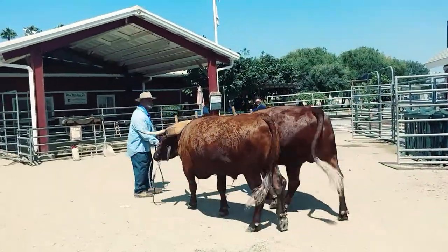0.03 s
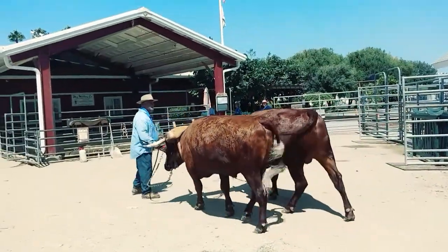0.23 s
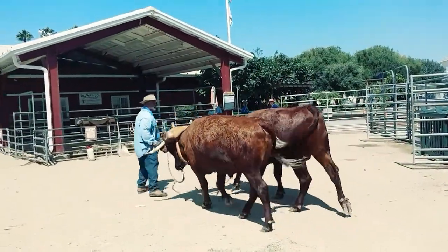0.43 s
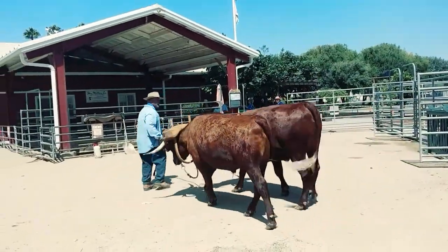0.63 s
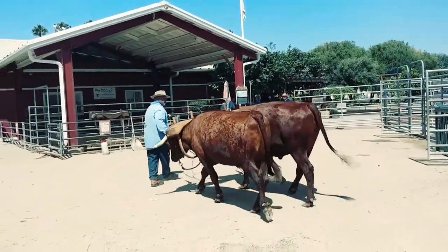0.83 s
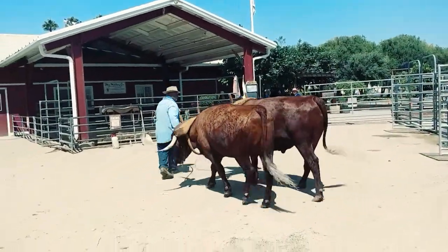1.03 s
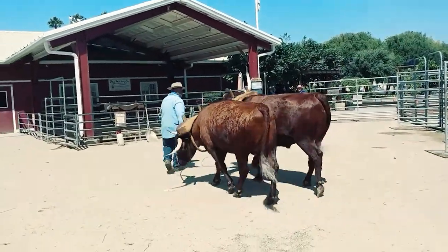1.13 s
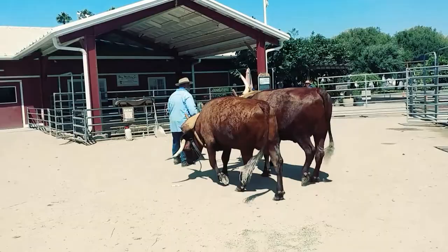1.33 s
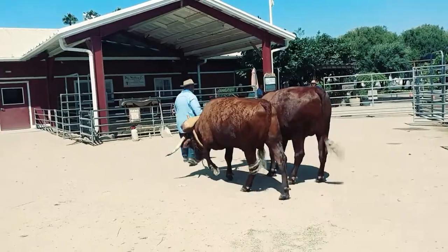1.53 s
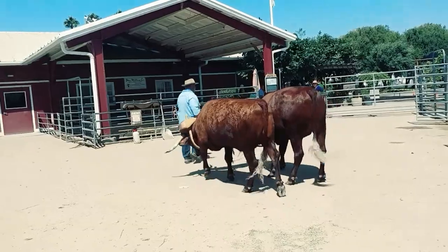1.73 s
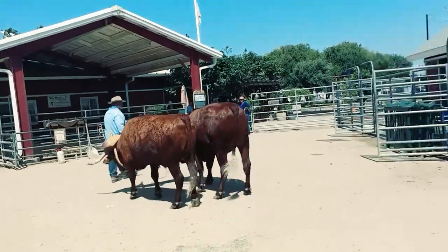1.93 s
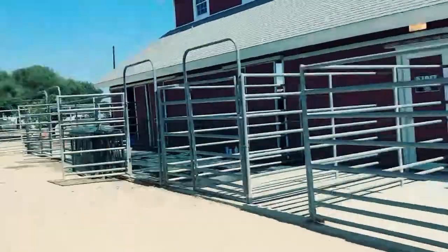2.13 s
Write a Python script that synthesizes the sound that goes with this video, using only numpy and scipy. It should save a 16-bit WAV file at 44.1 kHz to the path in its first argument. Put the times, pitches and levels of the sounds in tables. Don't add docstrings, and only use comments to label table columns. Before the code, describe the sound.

A cow gives a single deep moo that swells, rises and sags abruptly, over light metal chain clinks and a wooden hoof thud. Outdoor yard, dull short wall echo, distant traffic; phone stereo, right side duller.

```python
import sys
import numpy as np
from scipy import signal
from scipy.fft import rfft, irfft, next_fast_len
from scipy.io import wavfile
from scipy.ndimage import uniform_filter1d

SR = 44100
rng = np.random.default_rng(int(sys.argv[2]) if len(sys.argv) > 2 else 0)


def invert_db(x):
    u = np.asarray(x, float) / 20
    return 10 ** u


def materialize(psi):
    bounded = np.clip(np.atleast_2d(psi).T, -1, 1)
    quanta = np.round(bounded * 32767).astype(np.int16)
    wavfile.write(sys.argv[1], SR, quanta)


N = 97020


def at_hz(points, hz):
    table = np.array(points)
    return np.interp(np.log(hz + 1), np.log(table[:, 0]), table[:, 1])


def rms_one(x):
    return x / np.sqrt(np.mean(x ** 2) + 1e-20)


def drift(rate):
    r = np.exp(-80 * np.pi * rate / SR)
    noise = rng.standard_normal(N // 40 + 2002)
    slow = signal.lfilter([1], [1, -2 * r, r * r], noise)[2000:]
    return np.interp(np.arange(N) / 40, np.arange(len(slow)), rms_one(slow))


def ring(clicks, hz, t60):
    r, w = invert_db(-60 / (t60 * SR)), 2 * np.pi * hz / SR
    return signal.lfilter([0, np.sin(w)], [1, -2 * r * np.cos(w), r * r], clicks + 1e-18)


def colour(x, gain):
    size = next_fast_len(N + SR)
    hz = np.arange(size // 2 + 1) * SR / size
    return irfft(rfft(x, size) * gain(hz), size)[..., :N]


def resonance(hz, centre, width):
    return 1j * hz * width / (centre * centre - hz * hz + 1j * hz * width)


# (centre [Hz], width [Hz], level [dB], share of mouth opening [1],
# share of chest weight [1], share of rasp [1])
THROAT = [(252, 106, 7, 0, 1, 0.053), (359, 89, 3, -0.03, 0, -0.035), (523, 220, -6.5, 3.5, 0.059, -0.26),
          (696, 130, -3, 0.8, 0, -0.61), (944, 170, -0.5, 0.9, 0.26, -0.47),
          (1228, 169, -1.5, 0.66, 1, 0.12), (1572, 220, 1.5, 2, 0.95, 0.12),
          (2023, 210, -4.5, 0.75, 1, -0.42), (2523, 121, -5, 1.1, 0.074, 1), (2780, 330, -8, 2.2, 0, -0.98),
          (3175, 95, -4.5, 1.9, 0, 0.56), (3830, 180, -6, 4, 0, -0.91)]
NOSE_RESONANCES, NOSE_CUT_HZ = 4, 915
FOLD_CUT_HZ, CHEST_FROM_HZ = 3650, 248
NARROWING = 1
TUBE_ECHO_S, TUBE_ECHO_DB = 0.0015436, 3.5
TUBE_ECHO_FROM_HZ, TUBE_ECHO_TO_HZ = 550, 3000


def throat(hz, tuning, open_db, chest_db, rasp_db, wander_db):
    nose = 1 / (1 + (hz / NOSE_CUT_HZ) ** 4)
    out = 0
    for k, (centre, width, db, mouth, chest, rasp) in enumerate(THROAT):
        opening = open_db * mouth
        narrowed = width * invert_db(np.maximum(NARROWING * opening, -6))
        level = invert_db(db + opening + chest_db * chest + rasp_db * rasp + wander_db[k])
        exit_gain = nose if k < NOSE_RESONANCES else 1.3
        out = out + exit_gain * level * resonance(hz, centre * tuning, narrowed)
    fold = 1j * hz / FOLD_CUT_HZ
    fold_dulling = 1 / (1 + 1.083 * fold + fold * fold) ** 4
    low = 1j * hz / CHEST_FROM_HZ
    chest_cut = low * low / (1 + 1.34 * low + low * low)
    echo_band = hz ** 2 / (hz ** 2 + TUBE_ECHO_FROM_HZ ** 2) / (1 + (hz / TUBE_ECHO_TO_HZ) ** 4)
    echo = invert_db(TUBE_ECHO_DB) * echo_band * np.exp(-2j * np.pi * hz * TUBE_ECHO_S / tuning)
    return out * fold_dulling * chest_cut * (1 + echo) / 2


# (centre [Hz], width [Hz], gain at centre [dB])
WALL_COMB = [(239, 6.6, 5.5), (351.9, 4.9, -32), (395.4, 10, -29), (669.5, 15, 2.5)]


def wall_comb(hz):
    return np.prod([1 + (invert_db(db) - 1) * resonance(hz, c, w) for c, w, db in WALL_COMB], axis=0)


# (time [s], pitch [Hz], effort [dB], mouth opening [dB], chest weight [dB], rasp [dB])
MOO = [(0.042, 89.87, -45, -55, -2, 0), (0.138, 97.1, -38.5, -36.5, -0.5, -2),
       (.28, 103.1, -34.5, -34, 2.5, -8), (0.328, 105.5, -33.5, -6.5, 4, 1), (0.449, 109, -28, -4.5, 3, 4),
       (.6, 111, -26, -2.5, 1.5, 6.5), (.742, 114.8, -24, -2.5, 2.5, 6),
       (0.847, 118.9, -20.5, -2.5, 2, 3.5), (0.944, 125.6, -21, -0.77, 0.4, 0),
       (1.03, 129.3, -19.5, -0.1, -0.5, -1), (1.137, 133, -18, -0.8, -0.5, -5),
       (1.331, 129.7, -17.5, -0.48, -2.3, -3), (1.4, 123.7, -18, -1, -3.5, -1.5),
       (1.461, 113.8, -18.5, -0.5, -5.5, 2.5), (1.51, 99.43, -22.5, -0.5, -10, 3),
       (1.55, 91.45, -35.5, -3, 4.5, 0)]
# (time [s], resonance ratio [1])
TUNING = [(.3, 1.067), (.6, 1.045), (.85, 1.044), (1.0, 1.003), (1.2, 1.004), (1.45, 1.006), (1.55, 0.99)]
# (frequency [Hz], level [dB per Hz])
AIR = [(3500, -10), (5000, 4.5), (5800, 0.5), (6800, -13), (8100, 0.1), (9800, -9.5), (12000, -13.5),
       (14000, -44)]
AIR_DB, BREATH_DB, BREATH_FROM_HZ = -45, -24.5, 934
BREATH_DUTY = 1.15
JITTER, SHIMMER_DB, WANDER_DB = 0.002, 0.03, 1.3
SLACK_FROM_S, SLACK_JITTER, SLACK_BREATH_DB = 1.38, 0.012, 10.5
CLOSURE_TURN, LOW_LEAD_TURN, LOW_LEAD_HZ = -1.15, 3.3, 900


def moo():
    s, *columns = np.transpose(MOO)
    t = np.arange(N) / SR
    pitch, effort_db, open_db, chest_db, rasp_db = [
        uniform_filter1d(np.interp(t, s, c), size=1500) for c in columns]
    tuning = np.interp(t, *np.transpose(TUNING))
    slack = np.clip((t - SLACK_FROM_S) * 10, 0, 1)
    unsteady_pitch = pitch * (1 + (JITTER + SLACK_JITTER * slack) * drift(41))
    turn = 2 * np.pi * np.cumsum(unsteady_pitch) / SR

    grid = slice(0, N, 256)
    shape = [c[grid] for c in (tuning, open_db, chest_db, rasp_db)]
    wander_db = [WANDER_DB * drift(5)[grid] for _ in THROAT]
    voice = 0
    for k in range(1, 48):
        hz = k * pitch[grid]
        phase = CLOSURE_TURN - LOW_LEAD_TURN / (1 + (hz / LOW_LEAD_HZ) ** 2)
        h = np.exp(1j * phase) * throat(hz, *shape, wander_db)
        voice = voice + np.interp(t, t[grid], h.real) * np.cos(k * turn)
        voice = voice - np.interp(t, t[grid], h.imag) * np.sin(k * turn)
    voice = voice * invert_db(effort_db + SHIMMER_DB * drift(30)) / 2

    def breath_gain(hz):
        low_cut = hz ** 2 / (hz ** 2 + BREATH_FROM_HZ ** 2)
        return throat(hz, 1.01, 0, 0, 0, np.zeros(len(THROAT))) * 20 * invert_db(BREATH_DB) * low_cut

    cycle = turn / (2 * np.pi) % 1
    puffs = rng.standard_normal(N) * np.exp(-BREATH_DUTY * cycle) * invert_db(open_db + effort_db)
    breath = colour(puffs * invert_db(SLACK_BREATH_DB * slack), breath_gain)
    breath = breath + colour(puffs, lambda hz: 20 * invert_db(AIR_DB + at_hz(AIR, hz)))
    fade_in = np.clip((t - s[0]) / 0.073, 0, 1)
    fade_out = np.clip((s[-1] + 0.029 - t) / 0.035, 0, 1)
    return colour((voice + breath) * fade_in * fade_out, wall_comb)


# (time [s], level [dB], t60 [s])
RATTLES = [(0.098, -45.5, 0.26), (0.201, -54.5, 0.21), (0.295, -53, 0.081), (0.333, -44.5, 0.2),
           (0.362, -50.5, 0.11), (.425, -57, 0.11), (0.556, -47, 0.11), (0.629, -45, 0.34),
           (0.908, -42, 0.42), (0.969, -51, 0.27), (1.17, -46, 0.47), (1.27, -35, 0.14),
           (1.551, -37, 0.075), (1.57, -46.5, 0.25), (1.776, -59.5, 0.54), (1.964, -61, 0.48),
           (2.131, -47.5, 0.19), (2.144, -40.5, 0.043), (2.15, -34, 0.042), (2.16, -51, 0.12)]
# (frequency [Hz], level [dB per Hz])
RATTLE = [(1500, -2.5), (4500, 0), (6000, 2.5), (7200, -3.5), (9000, 6.5), (10500, -9.5), (13000, -8.5),
          (16000, -32)]
# (time [s], level [dB])
SMALL_HITS = [
    (.096, -33),
    (.63, -22),
    (1.39, -55),
    (1.49, -57),
    (1.881, -43),
]
MIDDLE_HITS = [
    (.632, -40.5),
    (.814, -52),
    (1.125, -50),
    (1.165, -51.5),
    (1.964, -53.5),
]
LARGE_HITS = [
    (.425, -52),
    (.5, -50),
    (.56, -54),
    (1.17, -42),
    (1.21, -44),
    (1.272, -46),
    (2.15, -57),
]
# (frequency [Hz], level [dB], t60 [s])
SMALL_LINK = [(15159, -4, .14), (15240, -3, .17), (15330, -6, .1), (15420, -5, .12), (15530, -6, .1),
              (15640, -1, .14), (15719, -3, .12)]
MIDDLE_LINK = [(11120, 2.5, .2), (11240, -8, 0.13), (11800, -7, 0.13)]
LARGE_LINK = [(5780, 2, 0.19), (6100, -1, 0.18)]
RATTLE_PER_S, CONTACT_T60_S = 3700, 0.19


def chain():
    t = np.arange(N) / SR
    spray = 0
    for s, db, t60 in RATTLES:
        onset = np.clip((t - s) / 0.0014, 0, 1)
        spray = spray + invert_db(db - 60 * np.maximum(t - s, 0) / t60) * onset
    contacts = rng.random(N) < RATTLE_PER_S / SR
    strength = invert_db(1.3 * np.minimum(rng.exponential(1, N), 3))
    grains = contacts * strength * 5.9 + 0.5
    out = rms_one(colour(grains * rng.standard_normal(N), lambda hz: invert_db(at_hz(RATTLE, hz)))) * spray
    links = ((SMALL_HITS, SMALL_LINK), (MIDDLE_HITS, MIDDLE_LINK), (LARGE_HITS, LARGE_LINK))
    for hits, modes in links:
        shake = sum(invert_db(db - 60 * np.maximum(t - s, 0) / CONTACT_T60_S) * (t >= s) for s, db in hits)
        for hz, db, t60 in modes:
            rung = ring(shake * rng.standard_normal(N) * invert_db(db) / 20, hz, t60)
            band = signal.butter(1, [hz * 0.9, hz * 1.1], "band", fs=SR, output="sos")
            out += signal.sosfilt(band, rung)
    return out


# (time [s], level [dB], frequency [Hz], t60 [s])
SNAPS = [
    (2.1465, -35, 6100, 0.0093),
    (2.152, -34, 11000, .005),
    (2.1548, -15.5, 5960, 0.0095),
    (2.1549, -21, 9000, .006),
    (1.4, -31.5, 7700, 0.0087),
]


def snaps():
    sample = np.arange(N)
    return sum(ring(invert_db(db) * (sample == int(s * SR)), hz, t60) for s, db, hz, t60 in SNAPS)


# (time [s], level [dB], pitch [Hz], t60 [s], scuff level
# [dB])
KNOCKS = [
    (0.404, -15, 178, 0.13, -34),
    (0.422, -19, 165, 0.07, -38),
    (.41, -29, 330, 0.1, -43),
    (.558, -21, 170, 0.05, -42),
          (0.412, -29, 890, .07, -38),
    (1.596, -33, 1000, .02, -40),
    (1.605, -25, 1200, 0.035, -39),
    (1.606, -34, 2020, .05, -47),
    (1.626, -36, 1500, .03, -46),
    (1.941, -37, 820, 0.07, -44),
    (1.942, -42, 2300, .05, -48),
]


def hooves():
    t, out = np.arange(N) / SR, 0
    band = signal.butter(3, [350, 2300], "band", fs=SR, output="sos")
    scuff = rms_one(signal.sosfilt(band, rng.standard_normal(N)))
    for s, db, hz, t60, scuff_db in KNOCKS:
        age = np.maximum(t - s, 0)
        envelope = np.clip(age / 0.00072, 0, 1) * invert_db(-60 * age / t60)
        out = out + envelope * (invert_db(db) * np.sin(2 * np.pi * hz * age) + invert_db(scuff_db) * scuff)
    return out


# (time [s], level [dB])
ECHOES = [
    (0.088, -22),
    (0.124, -20),
]
ECHO_SMEAR_S, WALL_CUT_HZ = 0.013, 1700
TAIL_DB, TAIL_T60_S = -8.5, 0.41


def sheds(x):
    t, out = np.arange(SR // 2) / SR, []
    for path_ratio in (1, 1.07):
        tail = invert_db(TAIL_DB - 60 * t / TAIL_T60_S) * (t > 0.01)
        response = tail * rng.standard_normal(len(t)) / 30
        for s, db in ECHOES:
            smear = np.exp(-((t - s * path_ratio) / ECHO_SMEAR_S) ** 2)
            response += invert_db(db) * smear * rng.standard_normal(len(t)) / 20
        echoed = signal.fftconvolve(x, response)[:N]
        out.append(colour(echoed, lambda hz: 1 / (1 + 1j * hz / WALL_CUT_HZ) ** 2))
    return np.array(out)


# (frequency [Hz], level [dB per Hz])
YARD = [(24, -40), (48, 0.7), (122, -3.5), (300, -16), (774, -25.5), (1870, -40.5), (9500, -53.5),
        (15000, -64)]
# (time [s], level [dB])
YARD_DB = [
    (0.0, -40.5),
    (0.26, -38),
    (1.49, -38),
    (2.06, -45.5),
    (2.2, -39.5),
]
# (frequency [Hz], left-right likeness [1])
LIKENESS = [(60, 0.99), (240, 0.34), (950, -1.46), (3770, -0.31), (15000, 0.01)]
# (frequency [Hz], left over right [dB])
YARD_SHADOW = [(60, -2), (380, 9), (2380, 11.5), (15000, 7)]


def yard():
    out, together = 0, drift(0.65)
    edges = 28 * 2 ** np.arange(0, 9.6, 0.5)
    white = rng.standard_normal((2, 2, N))
    for k, (low, high) in enumerate(zip(edges, edges[1:])):
        band = signal.butter(2, [low, high], "band", fs=SR, output="sos")
        mid, side = signal.sosfilt(band, white[k % 2])
        hz = np.sqrt(low * high)
        alike = np.clip(at_hz(LIKENESS, hz), 0, 1)
        lean = at_hz(YARD_SHADOW, hz) / 2
        gain = invert_db(at_hz(YARD, hz) + 2.8 * together + 1.58 * drift(15))
        pair = np.sqrt(1 + alike) * mid + np.sqrt(1 - alike) * side * [[1], [-1]]
        out = out + gain * invert_db(np.array([[lean], [-lean]])) * pair
    s, db = np.transpose(YARD_DB)
    return rms_one(out) * invert_db(np.interp(np.arange(N) / SR, s, db) + 4.0)


# (frequency [Hz], left over right [dB])
SHADOW = [(60, 25), (130, 5.5), (290, 4), (640, 14.5), (1410, 15), (3100, 29), (6820, 21), (15000, 52)]
LEFT_LAG_S = 0.00025


def scene():
    near = 1.046 * (moo() + chain() + snaps() + hooves())
    left, right = near + sheds(near)
    left = colour(left, lambda hz: np.exp(-2j * np.pi * hz * LEFT_LAG_S))
    right = colour(right, lambda hz: invert_db(-at_hz(SHADOW, hz)))
    return np.array([left, right]) + yard()


def roll_off(x):
    return signal.sosfilt(signal.butter(12, 16610, fs=SR, output="sos"), x)


def record(dry):
    low_cut = signal.butter(5, 44, "high", fs=SR, output="sos")
    top_cut = signal.cheby2(12, 60, 15950, fs=SR, output="sos")
    mix = signal.sosfilt(top_cut, signal.sosfilt(low_cut, np.tanh(dry)))
    return roll_off(mix)


dry = scene()
out = record(dry)
materialize(out)
```